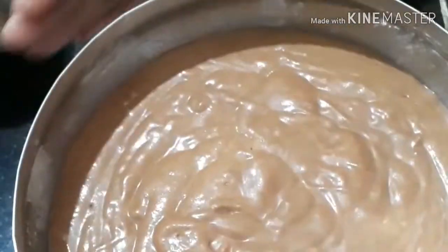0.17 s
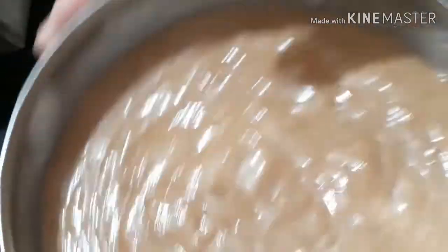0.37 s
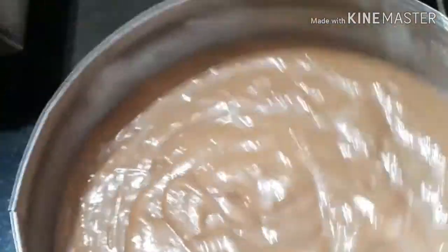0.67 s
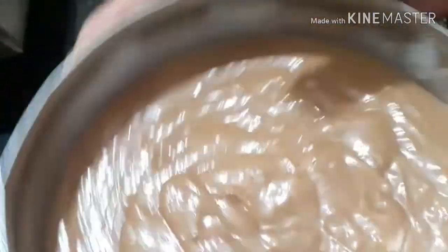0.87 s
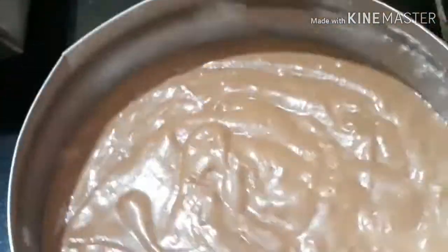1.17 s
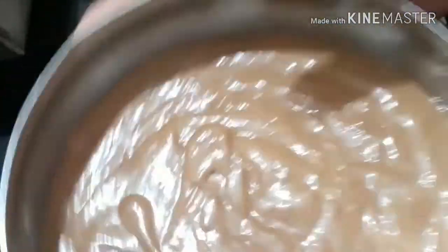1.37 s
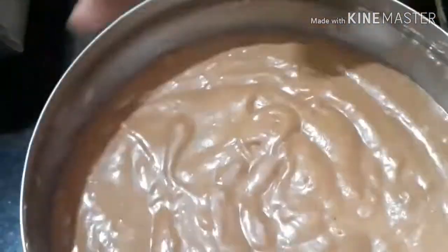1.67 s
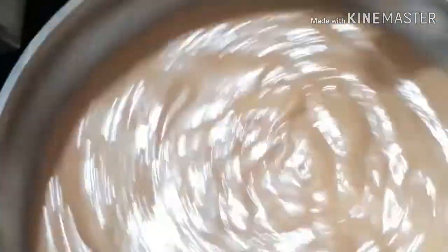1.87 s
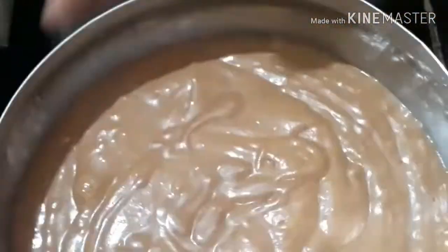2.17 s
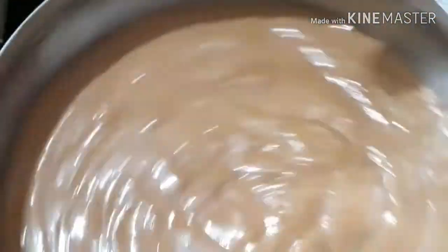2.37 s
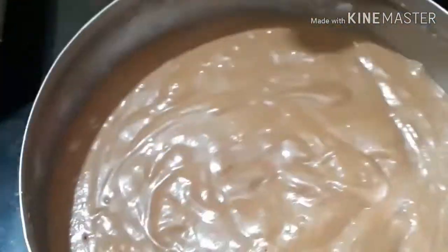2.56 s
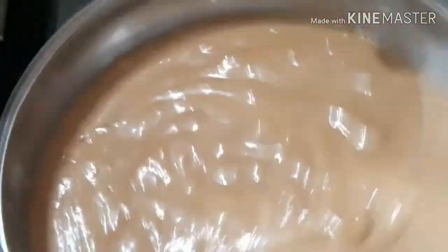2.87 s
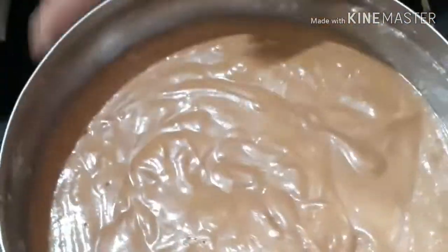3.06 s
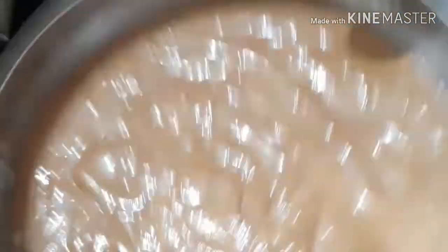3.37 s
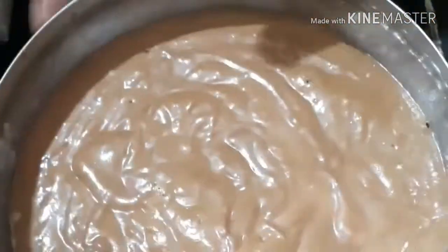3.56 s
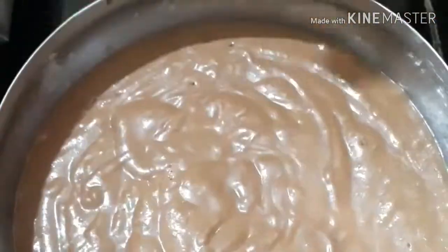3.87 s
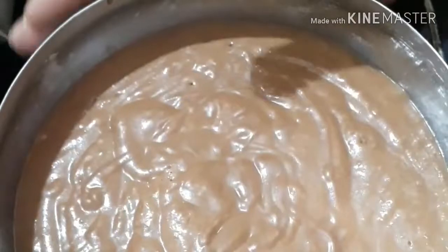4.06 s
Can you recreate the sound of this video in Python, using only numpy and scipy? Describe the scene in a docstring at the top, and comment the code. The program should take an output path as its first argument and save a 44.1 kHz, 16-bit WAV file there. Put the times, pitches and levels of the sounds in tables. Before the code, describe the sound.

Loud close double knocks of a full metal cake pan on a countertop, about two per second, with small rattling bounces and short echo.

```python
"""A steel pan heavy with batter is knocked on a kitchen counter, close to a phone: one edge lands, then the
base slaps down and bounces. Each contact is a crack of noise plus fading sines: the clack of the damped steel
wall and the thud of the base. Short gritty noises are the pan scraping as it is lifted. The counter hums at
its own modes and a hard-walled kitchen rings on in fading noise, over a faint steady hum and hiss."""
import sys
import numpy as np
from scipy import signal
from scipy.fft import rfft, irfft, next_fast_len
from scipy.io import wavfile

SR = 44100
rng = np.random.default_rng(int(sys.argv[2]) if len(sys.argv) > 2 else 0)


def file_out(sig):
    """Save sig as 16-bit WAV at sys.argv[1]."""
    # one column per channel
    cols = np.atleast_2d(sig).T
    # limit, then scale
    lim = np.clip(cols, -1, 1)
    pcm = np.round(lim * 32767).astype(np.int16)
    wavfile.write(sys.argv[1], SR, pcm)


def ratio_of_db(decibels):
    """Turn decibels (scalar or array-like) into linear amplitude factors; 0 dB maps to 1."""
    return 10 ** (np.asarray(decibels, float) / 20)


N = 186123  # length of the scene in samples

# Colour of the room's steady hum and hiss, relative: (f/Hz, level/dB per Hz)
FLOOR_COLOUR = [(30, -23), (60, -4.5), (110, 13.5), (170, -5.5), (270, 2.5), (440, 0.5), (600, -5.5),
                (1100, -11.5), (2000, -17.5), (3500, -25), (6000, -28.5), (8700, -27), (10000, -33.5),
                (15500, -37.5)]
FLOOR_RMS_DB = -50.5

# The base drags off the counter and bumps it as it leaves:
# (t/s, grit level/dB, length/s, bump level/dB)
SCRAPES = [(0.049, -24.5, .01, -24), (0.643, -24.5, 0.0073, -32), (1.1181, -26.5, 0.013, -21.5),
           (1.59, -20, 0.0035, -33.5), (2.027, -33.5, 0.0099, -23.5), (2.475, -29.5, 0.013, -28),
           (2.938, -30.5, 0.022, -19.5), (3.409, -37, 0.0067, -35)]
# Colour of the scraping grit: (f/Hz, level/dB)
GRIT_COLOUR = [(1500, -13.5), (3400, 4.5), (4500, -3.5), (6500, -0.5), (9000, -4), (12000, -12),
               (15500, -12.5)]
BUMP_SHARE = 0.68  # share of the drag's length that passes before the bump
BUMP_THUD_HZ, BUMP_CLACK_DB = 295, -16.5  # thud centre; clack relative to the thud

# One edge lands first: (t/s, crack level/dB, clack level/dB, clack centre f/Hz)
EDGES = [(0.4086, -13.5, -2, 1600), (0.8889, -5, -6, 1740), (1.3706, -7.5, 1.5, 1633),
         (1.8168, -10.5, -6, 1300), (2.2614, -6, 0.5, 1820), (2.7132, -4.5, 1, 1780),
         (3.1977, -11, -5.5, 1545), (3.6444, -10.5, -1, 1600)]
EDGE_THUD_DB, EDGE_THUD_HZ = -4.5, 344  # always the same weight behind it

# Then the whole base slaps down: (t/s, crack level/dB, thud level/dB, clack level/dB,
# clack centre f/Hz, thud centre f/Hz)
SLAPS = [(.415, -8.5, 3, -16, 1640, 280), (0.9184, -17, -4.5, -6.5, 1260, 284),
         (1.384, -6.5, -2, -10.5, 1000, 400), (1.8395, -4, 0.5, -8, 1410, 289),
         (2.2807, -6.5, -0.5, -11, 1300, 269), (2.7385, -7.5, 1, -10, 960, 252),
         (3.2082, -10, 1, -6, 1110, 333), (3.661, -10.5, -4.5, -13.5, 1430, 353)]

# The pan rocks and bounces: (t/s, thud level/dB, clack level/dB, thud centre f/Hz)
BOUNCES = [(0.0636, -19, -31, 310), (0.0748, -24.5, -40, 273), (0.0846, -22, -36.5, 324),
           (.432, -5.5, -29, 445), (0.443, -14.5, -22, 275), (0.4634, -8.5, -14.5, 272),
           (0.4944, -10.5, -23, 394), (0.4993, -9, -11, 358), (0.511, -18.5, -25, 398),
           (0.5209, -12, -41, 337), (.532, -11, -26, 240), (0.9236, -20.5, -13, 280),
           (.932, -4.5, -26, 342), (0.945, -11, -33, 306), (0.9708, -11.5, -32.5, 275),
           (1.3981, -1.5, -19.5, 353), (1.4279, -9, -18.5, 345), (1.867, -5, -22.5, 340),
           (1.8956, -7.5, -19.5, 313), (2.292, -7.5, -20, 296), (2.3147, -9, -26.5, 305),
           (2.3275, -7.5, -24, 350), (2.7603, -6, -20, 298), (2.787, -4, -20.5, 267),
           (3.225, -10.5, -16, 420), (3.2338, -16, -24, 261), (3.2514, -11.5, -26.5, 309),
           (3.2631, -8.5, -26, 313), (3.683, -5.5, -18.5, 307)]
FLAT_CLACK_HZ = 1230  # light flat touches favour the lower wall modes
# The crack of a light touch follows its clack: crack dB = slope * clack dB + offset
CRACK_PER_CLACK, CRACK_OFFSET_DB = 0.9, -3.5

# Chatter: tiny extra touches just after each slap
CHATTER_S, CHATTER_DB = 0.05, -12  # longest delay; level at zero delay, relative to the slap's clack
CHATTER_FADE_DB_PER_S, CHATTER_SPREAD_DB = 250.5, 3  # fade with delay; random spread of the levels

# Modes of the loaded base on the counter, levels relative: (f/Hz, level/dB, t60/s)
BASE_MODES = [(205, -3.5, .07), (251.6, 10.5, 0.084), (275, 0.5, .07), (305, 6.5, 0.08),
              (329.4, 4.5, 0.084), (379.5, 9, 0.035), (424, 2.5, 0.031), (546, -19, 0.08), (670, -31, .05)]
# Modes of the steel wall, damped by batter and hands, levels relative: (f/Hz, level/dB, t60/s)
WALL_MODES = [(815, -3, 0.026), (956, -3, 0.018), (1169, -2.5, 0.012), (1300, -3, 0.016),
              (1406, -3.5, 0.013), (1550, 3, 0.0085), (1774, -19, 0.037), (2240, -3.5, 0.011),
              (2197, 17.5, 0.0025), (2880, -21, 0.0066), (3650, -26, 0.017)]
# Colour of the crack of a contact: (f/Hz, level/dB)
CRACK_COLOUR = [(1500, -11), (3000, 5.5), (4500, -3), (6500, -5), (8700, -3), (10000, -12), (12000, -11),
                (15500, -17)]
# The pan wall's sound over all directions, smoother than towards the phone: (f/Hz, level/dB)
CLATTER_COLOUR = [(300, -31.5), (600, -3), (1000, -2), (1500, -1.5), (2000, 0), (2700, -4.5), (3500, -13),
                  (4500, -21.5), (7000, -33)]
# Modes of the counter top and the cupboard under it: (f/Hz, level/dB, t60/s)
COUNTER_MODES = [(83, -63, 0.26), (112, -59, 0.71), (140.4, -56.5, 0.5), (210.9, -61, 0.4),
                 (241.8, -65.5, 0.41), (272, -62, 0.48), (298.1, -62.5, 0.3), (327.6, -61.5, 0.34),
                 (367.4, -58, 0.11), (385, -61, 0.33), (447.6, -57, 0.2), (463, -58, .35), (598, -61, 0.42),
                 (657, -58, 0.3), (953, -55.5, 0.4)]
# Echo bands of the kitchen, levels relative: (centre f/Hz, level/dB, t60/s)
KITCHEN_BANDS = [(72.4, -12, 0.37), (134, -19.5, 0.7), (280, -9, 0.67), (575, -4, 0.47), (1104, -4.5, 0.57),
                 (2240, -8.5, 0.57), (4930, -8, 0.5), (9050, -8.5, 0.43), (14500, -24.5, 0.64)]

# The phone: resonance of its sound port, bass thinning and top limit
PORT_HZ, PORT_WIDTH_HZ, PORT_DB = 8800, 330, -9
BASS_CUT_HZ, BASS_LEAK_DB, RUMBLE_CUT_HZ = 208, -13.5, 20
TOP_HZ = 15600


def shaped(sound, points):
    """Colour a sound by (f/Hz, level/dB) points; a folded cepstrum keeps the response causal."""
    hz, db = np.transpose(points)
    size = 2 * next_fast_len(len(sound) // 2 + 1)
    bins_hz = np.arange(size // 2 + 1) * SR / size + 1
    gain = ratio_of_db(np.interp(np.log(bins_hz), np.log(hz), db))
    cepstrum = irfft(np.log(gain), size)
    # fold the "before" half onto the "after" half, so no sound comes before its cause
    cepstrum[1:size // 2] *= 2
    cepstrum[size // 2 + 1:] = 0
    response = np.exp(rfft(cepstrum))
    return irfft(rfft(sound, size) * response, size)[:len(sound)]


def add(out, start_s, sound, peak_db):
    """Mix a sound into out at start_s, scaled so that its peak is at peak_db."""
    i = int(start_s * SR)
    sound = sound[:len(out) - i]
    out[i:i + len(sound)] += sound * ratio_of_db(peak_db) / np.abs(sound).max()


def decays(modes, seconds):
    """A struck body rings in modes: one fading sine for each (f/Hz, level/dB, t60/s) row."""
    hz, db, t60 = (column[:, None] for column in np.transpose(modes))
    t = np.arange(int(seconds * SR)) / SR
    fade = np.exp(-np.log(1000) * t / t60)  # 60 dB down after t60
    return ratio_of_db(db) * fade * np.sin(2 * np.pi * hz * t)


def floor():
    """Steady low hum and hiss of the room: noise with a fixed colour."""
    air = shaped(rng.standard_normal(N), FLOOR_COLOUR)
    return air * ratio_of_db(FLOOR_RMS_DB) / np.std(air)


def scrapes():
    """Short gritty drags: dense uneven clicks that start almost at once and fade."""
    out = np.zeros(N)
    t = np.arange(int(.05 * SR)) / SR
    for start_s, db, length_s, _ in SCRAPES:
        unevenness = ratio_of_db(3 * rng.standard_normal(len(t)))
        grit = rng.standard_normal(len(t)) * unevenness
        rise = np.minimum(t / 0.0019, 1)
        fade = 1 / (1 + (t / max(length_s, .001)) ** 3.1)
        add(out, start_s, grit * rise * fade, db)
    return shaped(out, GRIT_COLOUR)


def soft_touch(start_s, thud_db, clack_db, thud_hz):
    """A light flat touch, its crack level following from its clack level."""
    crack_db = CRACK_PER_CLACK * clack_db + CRACK_OFFSET_DB
    return start_s, crack_db, thud_db, clack_db, FLAT_CLACK_HZ, thud_hz


def contacts():
    """All contacts: (t/s, crack level/dB, thud level/dB, clack level/dB, clack centre f/Hz, thud centre f/Hz)."""
    rows = [soft_touch(start_s + BUMP_SHARE * length_s, bump_db, bump_db + BUMP_CLACK_DB, BUMP_THUD_HZ)
            for start_s, _, length_s, bump_db in SCRAPES]
    rows += [(start_s, crack_db, EDGE_THUD_DB, clack_db, clack_hz, EDGE_THUD_HZ)
             for start_s, crack_db, clack_db, clack_hz in EDGES]
    rows += SLAPS
    rows += [soft_touch(*bounce) for bounce in BOUNCES]
    # six touches of chatter after each slap
    for start_s, _, _, clack_db, _, thud_hz in SLAPS:
        delays_s = CHATTER_S * rng.random(size=6)
        for delay_s, odd in zip(delays_s, rng.standard_normal(size=6)):
            faded_db = clack_db + CHATTER_DB - CHATTER_FADE_DB_PER_S * delay_s
            db = faded_db + CHATTER_SPREAD_DB * odd
            rows.append(soft_touch(start_s + delay_s, db, db, thud_hz))
    return rows


def ring(modes, centre_hz, spread_octaves, rise_s):
    """Struck modes: the landing spot favours those near its centre; the ring swells during the contact."""
    octaves = np.log2(np.transpose(modes)[0] / centre_hz)
    scatter_db = 1.5 * rng.standard_normal(len(modes))
    strength = ratio_of_db(scatter_db - 10 * (octaves / spread_octaves) ** 2)
    sound = strength @ decays(modes, seconds=.2)
    t = np.arange(len(sound)) / SR
    return sound * (1 - np.exp(-t / rise_s)) ** 2


def knocks():
    """Crack of grit and steel, clack of the wall, thud of the base; also the blows as the room receives them."""
    crack, clack, thud, sharp, dull = np.zeros((5, N))
    t = np.arange(int(.04 * SR)) / SR
    rise = 1 - np.exp(-t / 0.00081)
    fade = np.exp(-t / 0.0017) + 0.072 * np.exp(-t / 0.012)  # quick fade with a weak, longer tail
    for start_s, crack_db, thud_db, clack_db, clack_hz, thud_hz in contacts():
        burst = rng.standard_normal(len(t)) * rise * fade
        add(crack, start_s, burst, crack_db)
        add(clack, start_s, ring(WALL_MODES, clack_hz, 0.51, 0.0011), clack_db)
        add(thud, start_s + 0.0012, ring(BASE_MODES, thud_hz, 0.41, 0.00057), thud_db)
        # single clicks of random sign stand for the crack and clack sent into the room
        click = rng.choice([-1., 1.], size=1)
        add(sharp, start_s, click, crack_db)
        add(dull, start_s, click, clack_db)
        # a second click, sized by the thud, feeds the echo a bright wash
        add(sharp, start_s + 0.0043, -click, thud_db - 19.5)
    near = shaped(crack, CRACK_COLOUR) + clack + thud
    to_room = ratio_of_db(11.0) * shaped(sharp, CRACK_COLOUR) + ratio_of_db(25.0) * shaped(dull, CLATTER_COLOUR) + thud
    return near, to_room


def counter(blows):
    """The counter takes up each blow and hums at its own modes."""
    hum = decays(COUNTER_MODES, seconds=1.).sum(axis=0)
    return signal.fftconvolve(blows, hum)[:N]


def kitchen(sound):
    """Dense reflections: bands of noise that build up together and die away at their own rates."""
    t = np.arange(SR) / SR
    build_up = 1 - np.exp(-t / 0.0062)
    echo = 0
    for hz, db, t60 in KITCHEN_BANDS:
        octave = [(hz / 2, -40), (hz / 1.4, 0), (hz * 1.4, 0), (hz * 2, -40)]
        band = shaped(rng.standard_normal(SR), octave)
        band = band * np.exp(-np.log(1000) * t / t60) * build_up
        # the root evens out the energy of long and short fades
        echo = echo + ratio_of_db(db) * band / np.sqrt(t60 * SR / 14)
    return signal.fftconvolve(sound, echo)[:N]


def scene():
    """Pan, counter, kitchen echo and room floor add up at one microphone."""
    near, to_room = knocks()
    drag = scrapes()
    echo = kitchen(to_room + ratio_of_db(-4.0) * drag)
    mix = near + drag + counter(to_room) + echo + floor()
    return mix[None]  # one channel


def high_pass(sound, hz, order):
    """Weaken what lies below hz, more steeply for a higher order."""
    return signal.sosfilt(signal.butter(order, hz, "high", fs=SR, output="sos"), sound)


def low_pass(x):
    """Removes everything above the highest recorded frequency."""
    return signal.sosfilt(signal.butter(12, 16830, fs=SR, output="sos"), x)


def record(dry):
    """The phone's sound port resonates; it thins the bass, rounds the loudest peaks and cuts the top."""
    resonance = signal.lfilter(*signal.iirpeak(PORT_HZ, PORT_HZ / PORT_WIDTH_HZ, fs=SR), dry)
    port = dry + ratio_of_db(PORT_DB) * resonance
    bass_leak = ratio_of_db(BASS_LEAK_DB) * high_pass(port, RUMBLE_CUT_HZ, order=2)
    thin = high_pass(port, BASS_CUT_HZ, order=6) + bass_leak
    rounded = np.tanh(.8 * thin) / .8
    top_cut = signal.ellip(6, .2, 22, TOP_HZ, fs=SR, output="sos")  # 0.2 dB ripple, 22 dB down above
    finished = signal.sosfilt(top_cut, rounded)
    return low_pass(finished)


dry = scene()
out = record(dry)
file_out(out)
```